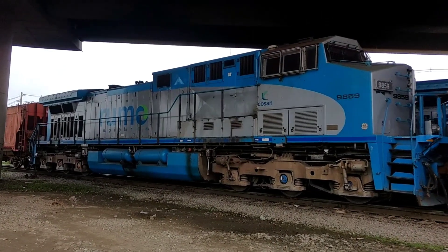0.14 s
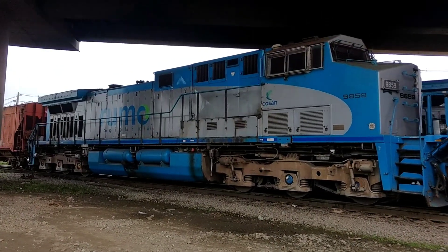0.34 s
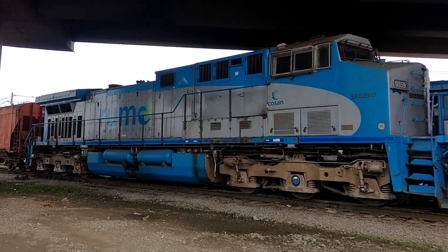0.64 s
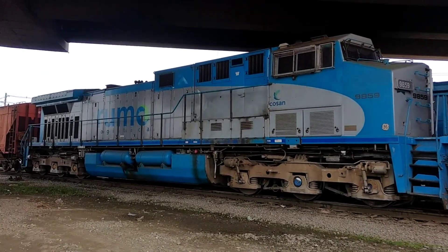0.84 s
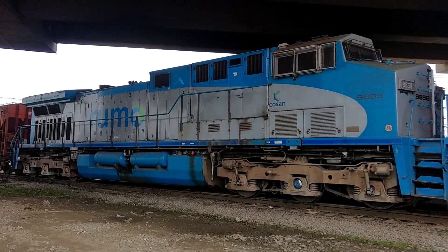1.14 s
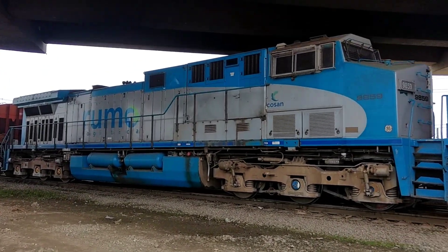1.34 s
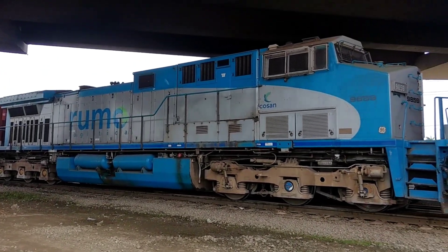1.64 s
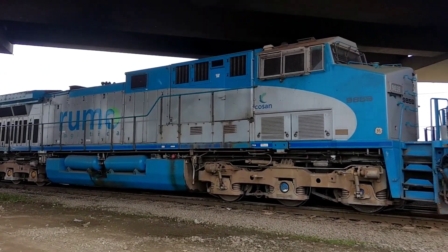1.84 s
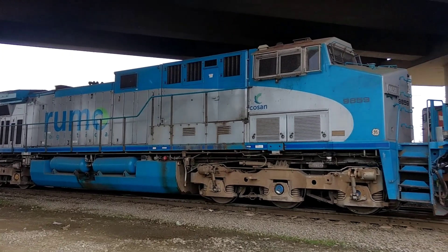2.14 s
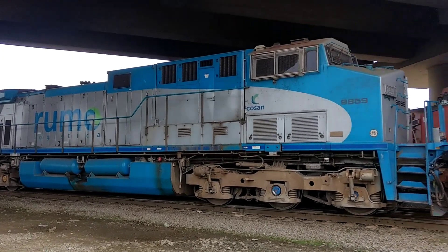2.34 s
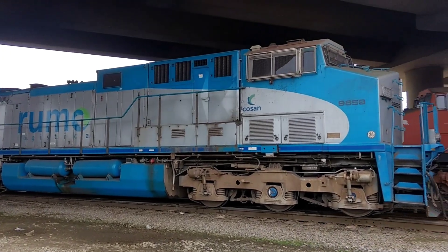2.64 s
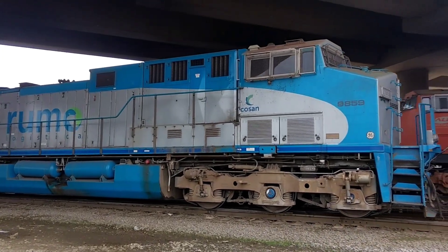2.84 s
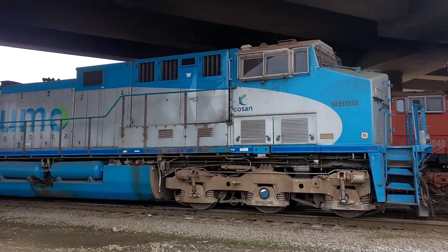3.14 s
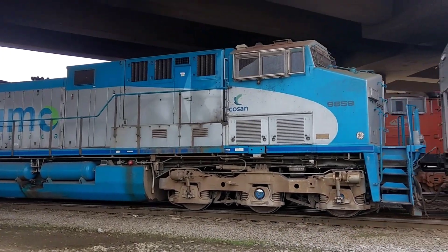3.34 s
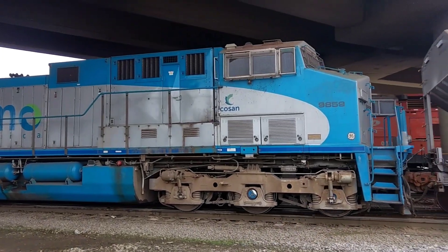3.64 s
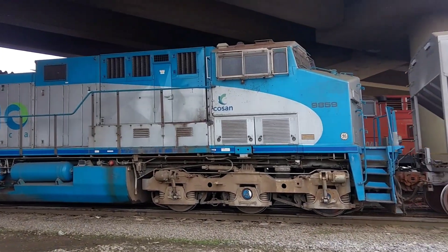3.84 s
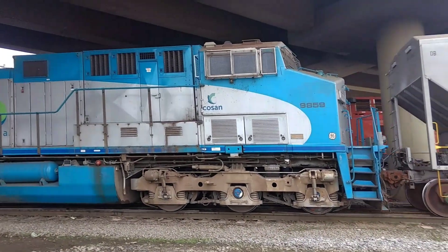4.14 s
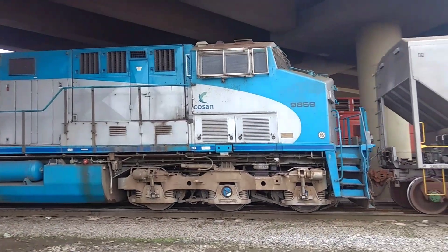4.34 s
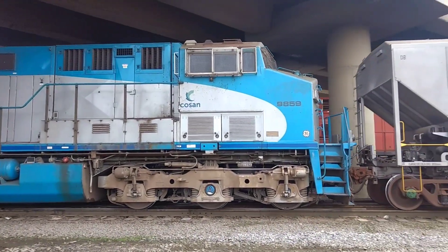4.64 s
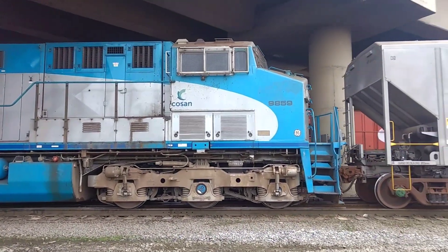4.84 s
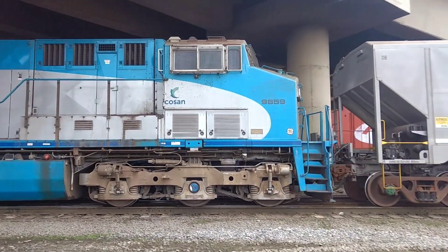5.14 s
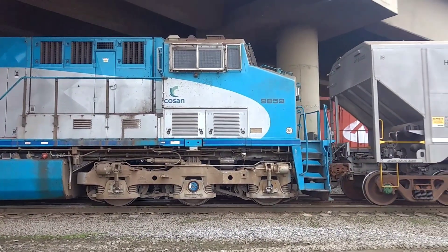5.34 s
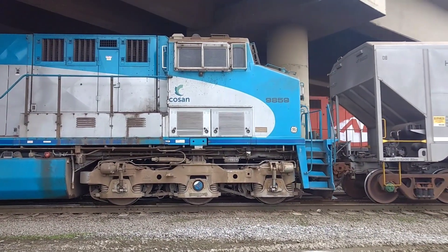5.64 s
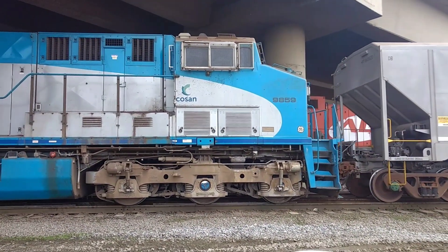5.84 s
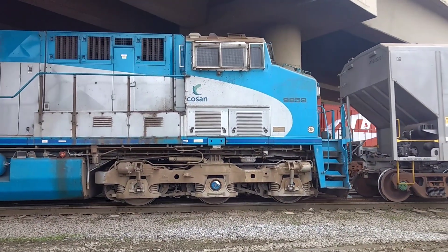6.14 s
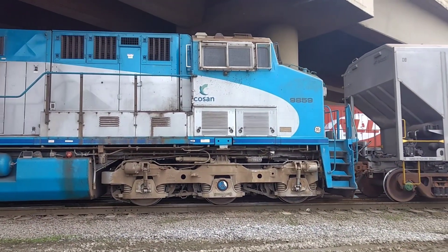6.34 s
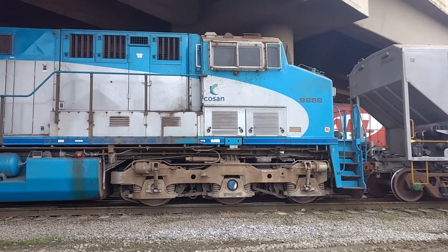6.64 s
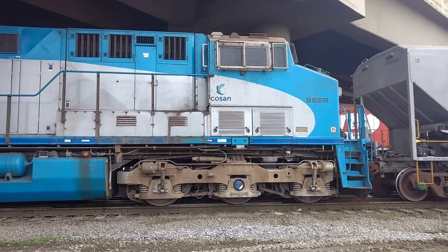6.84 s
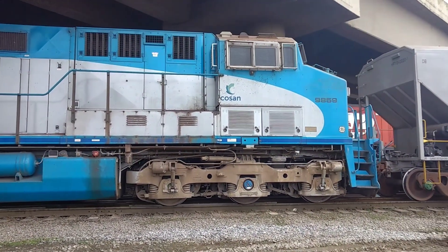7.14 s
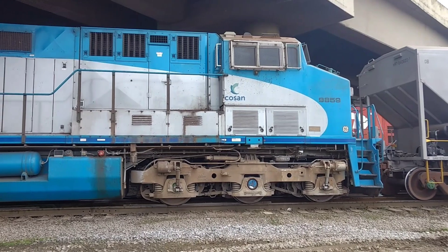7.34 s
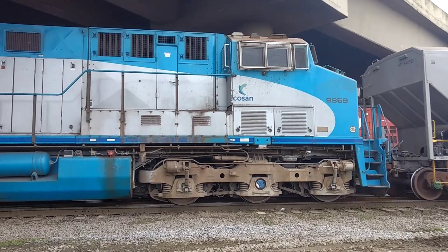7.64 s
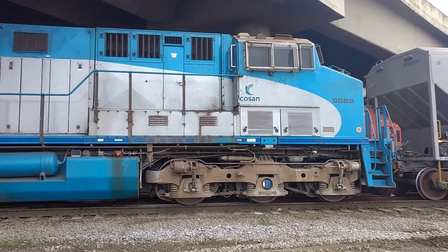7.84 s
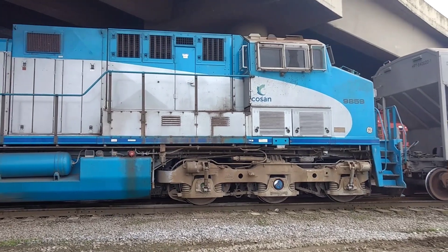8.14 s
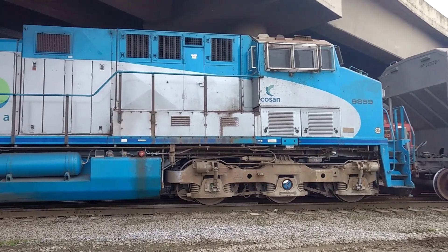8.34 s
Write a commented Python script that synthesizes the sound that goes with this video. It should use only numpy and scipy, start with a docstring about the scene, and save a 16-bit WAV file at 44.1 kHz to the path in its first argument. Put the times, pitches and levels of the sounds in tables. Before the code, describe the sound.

A heavy diesel locomotive idles close by under a concrete overpass, its low rumble throbbing about five times a second beneath mechanical whirr and a thin wavering whine. A drain valve spits hard, bright air every two-thirds of a second, with irregular softer pops between. Each burst echoes off concrete with slight wet spatter. The stereo microphone moves along, the engine fading; loud spits briefly duck it and it swells back.

```python
"""Under a concrete overpass a sixteen-cylinder diesel locomotive idles and gets quieter as the microphone moves off.
Neighbouring exhaust orders beat into one throb per engine cycle, over gated noise, gear tones and a blower whine.
Air-system drain valves spit and pop: shaped jet noise with a ringing outlet, concrete echoes and water spatter.
A metal squeak passes faintly. Loud spits push a limiter down, and the engine slowly swells back."""
import sys
import numpy as np
from scipy import signal
from scipy.fft import rfft, irfft, next_fast_len
from scipy.io import wavfile
from scipy.ndimage import uniform_filter1d, minimum_filter1d, map_coordinates

SR = 44100
rng = np.random.default_rng(int(sys.argv[2]) if len(sys.argv) > 2 else 0)


def store_wav(level_fs):
    """Save 16-bit WAV to argv[1]."""
    pcm = np.round(np.clip(np.atleast_2d(level_fs), -1, 1) * 32767)
    wavfile.write(sys.argv[1], SR, pcm.T.astype(np.int16))


N = 374409
TIME_S = np.arange(N) / SR

# Source levels are ahead of the limiter; engine, blower and valves also pass the stereo stage,
# the squeak does not. Spectra are shapes, scaled to rms 1.

# Faint metal squeak: (time [s], half length [s], frequency [Hz], level [dB])
SQUEAK = (3.46, 0.055, 3720, -51)

# Blower tone, swelling and fading through its reflections: (time [s], level [dB])
BLOWER_LEVEL = [(0.1, -31.5), (0.35, -37), (0.7, -37.5), (1.0, -42.5), (1.3, -34), (1.8, -50), (2.3, -43),
                (2.8, -43.5), (3.1, -39), (3.5, -40), (3.75, -45), (4.05, -35), (4.6, -45.5), (4.9, -42),
                (5.3, -51), (5.9, -44), (6.25, -41), (6.5, -45.5), (6.8, -48), (7.25, -40.5), (7.55, -42),
                (7.85, -41), (8.25, -40.5), (8.49, -42)]
BLOWER_HZ = 1027

CYCLE_HZ, THROB_AT_S = 4.843, 2.896  # engine cycle rate; a moment when the exhaust orders align
# Exhaust, shaded by the body as the microphone moves:
# (time [s], firing tone [dB], order just below it [dB], unequal cylinders [dB])
EXHAUST_LEVELS = [(0, -33.5, -38, -46), (1.0, -36, -47, -48), (2.1, -36.5, -41, -43.5),
                  (3.4, -33, -37.6, -46), (4.5, -40, -45, -44), (5.5, -39.5, -42, -60),
                  (6.2, -40, -40.5, -54), (6.8, -45, -44, -60), (7.6, -72, -45, -57), (8.49, -60, -47, -63)]
# Unequal cylinders around the firing rate: (multiple of the cycle [1], relative level [dB])
EXHAUST_ORDERS = [(11, -24), (13, 1.5), (14, -5.5), (17, -14)]
# Gear train: (multiple of the cycle [1], level re block noise [dB])
GEAR_ORDERS = [(36, -13.5), (72, -11), (96, -12), (120, -19), (144, -21.5), (288, -22)]
# Combustion noise alike in every cycle: (frequency [Hz], repeating power share [1])
CYCLE_REPEAT = [(50, 0.55), (75, 0.27), (105, 0.47), (160, 0.26), (300, 0.18), (700, 0.077), (2000, 0.063)]
# Block roar: (frequency [Hz], level [dB])
ROAR_SPECTRUM = [(20, -60), (42, -44), (56, -6), (85, -6.5), (115, -4.5), (140, -1), (180, -3), (250, -2),
                 (315, -2), (400, -5.5), (600, -6.5), (850, -7), (1200, -9.5), (1500, -19), (2200, -31),
                 (5000, -67)]
# Mechanical whirr: (frequency [Hz], level [dB])
WHIRR_SPECTRUM = [(700, -19), (1400, -7), (1850, 2.5), (2300, -6.5), (2900, -7), (3600, -17), (4800, -21.5),
                  (6000, -21), (7500, -19.5), (10000, -33.5), (12500, -37), (15500, -48)]
# Starting levels, and their fall as the microphone moves off toward the cab
ROAR_START_DB, ROAR_FALL_DB_PER_S = -26, 1.24
WHIRR_START_DB, WHIRR_FALL_DB_PER_S = -32, 0.82

# Regular valve, about every 2/3 s: (time [s], nominal peak [dB], length [s], outlet [Hz],
# outlet re jet [dB], shrill top re jet [dB], deck echo re hiss [dB])
SPITS = [(0.256, -6, .0071, 3280, -24, -1, -17), (0.925, -4, 0.01, 4970, -8.5, 3.5, -10.5),
         (1.5985, -3.5, 0.0041, 5940, -12, -2.5, -14), (2.2335, -3.5, 0.0051, 8200, -8, -2, -10),
         (2.9329, -4, 0.0031, 4390, -15, -3, -12), (3.6283, -4, 0.006, 4500, -20, 1, -11.5),
         (4.2655, -4, 0.0044, 8200, -17, -2, -11.5), (4.9598, -2.5, 0.0024, 8000, -14, -1.5, -14),
         (5.6205, -3.5, 0.0051, 2260, -8, 6.5, -11), (6.3, -6, 0.0024, 2300, -17, 0, -16),
         (6.9973, -5.5, 0.0029, 2350, -11, -3.5, -16), (7.655, -6.5, 0.0033, 4440, -13, -1, -18),
         (8.3216, -6, 0.0021, 6300, -8, -12, -20)]
# Pops of a second, irregular valve, and one faint high tick at 2.81 s: (time [s], nominal peak [dB],
# length [s], outlet [Hz], outlet re jet [dB], shrill top re jet [dB], deck echo re hiss [dB])
POPS = [(0.5115, -12, 0.0031, 3650, -5.5, -11, -25), (2.3502, -5.5, 0.0018, 4460, -5, -26, -27),
        (2.809, -31, 0.004, 11000, -19, -20, -20), (3.996, -9, 0.0014, 2680, 2, -11, -5.5),
        (5.4158, -10, 0.0037, 2200, 7.5, -16, -6), (6.6155, -13.5, 0.0025, 2780, -3.5, -6, -11),
        (8.072, -9.5, 0.0025, 2900, -2, 2.5, -31)]
CREST_DB = 5.5  # nominal peak above the highest short-time rms
# Air jet: (frequency [Hz], level [dB])
JET_SPECTRUM = [(500, 0.5), (1500, -5), (3000, -8.5), (4500, -6), (5300, -10), (5900, -2), (6700, -6),
                (7800, 0), (9500, -3.5), (11200, -14), (12400, 2), (14000, -22), (15500, -4.5)]
# Shrill top of the jet, drives the limiter: (frequency [Hz], level [dB])
SHRILL_SPECTRUM = [(16000, -60), (17000, 0)]
# Spatter, smeared echoes and ring: (frequency [Hz], level [dB])
SCATTER_SPECTRUM = [(1000, -8), (3000, 2), (5000, -2), (6300, 3.5), (8500, 1), (11000, -6.5), (12800, -4.5),
                    (15500, -14)]
# Ring of the overpass: (frequency [Hz], T60 [s])
OVERPASS_T60 = [(500, 0.13), (4000, 0.52), (8000, 0.79), (15000, 0.5)]
# Slap of a pillar that the microphone passes: (time [s], level re hiss [dB])
PILLAR_ECHO = [(4.3, -21), (4.96, -11), (5.42, -1.5), (5.62, -3), (6.3, -7), (6.62, -8), (7, -27)]
PILLAR_DELAY_S = 0.0177
DECK_SPREAD_S = 0.0088
WALL_DELAY_S, WALL_SPREAD_S, WALL_START_DB = 0.15, 0.0045, -33
ECHO_FALL_DB_PER_S, RING_FALL_DB_PER_S = 1.5, 0.43
SPATTER_START_DB, SPATTER_RISE_S, SPATTER_T60_S = -19, 0.0086, 0.18

# Stereo widening, phase between left and right: (frequency [Hz], lead of left [rad])
STEREO_PHASE = [(0, .9), (75, 1.2), (150, .55), (500, .4), (1000, -.55), (1250, -.9), (1700, -3.14),
                (3600, -9.42), (5350, -15.7), (17800, -59.69)]
# Stereo widening, balance: (frequency [Hz], left minus right [dB])
STEREO_BALANCE = [(30, -5), (75, 0.5), (150, 1), (300, 1.5), (600, 4.5), (1000, 1), (1400, -3.5), (2000, 0),
                  (12000, -1)]
# Scatter of opposite sign in the channels, before its comb: (frequency [Hz], level re source [dB])
STEREO_SCATTER = [(30, -22), (75, -13), (150, -6), (450, -6), (1400, -8), (2300, -17), (4000, -4.5),
                  (8000, -28), (12000, 1.5)]
# Floor of the scatter comb: (frequency [Hz], share left in the notches [1])
COMB_FLOOR = [(1000, 0.4), (1800, 1), (3600, 0.042), (5400, 0.061)]
COMB_LAG_S = 0.000562
TOP_HZ = 15600


def amp(db):
    """Decibels to gain."""
    return 10 ** (np.asarray(db) / 20)


def unit(x):
    """Scale to rms 1."""
    return x / np.sqrt(np.mean(x ** 2) + 1e-20)


def along(points, hz):
    """Read (Hz, value) points on a log frequency axis."""
    point_hz, value = np.transpose(points)
    return np.interp(np.log(hz + 1), np.log(point_hz + 1), value)


def curves(rows):
    """One value per sample for each column after the time."""
    time_s, *columns = np.transpose(rows)
    return [np.interp(TIME_S, time_s, column) for column in columns]


def wobble(knots_per_s):
    """Smooth random curve."""
    return map_coordinates(rng.standard_normal(1024), [TIME_S * knots_per_s], mode="wrap")


def filtered(x, response):
    """Apply a complex response of frequency."""
    size = next_fast_len(N + 8192)
    hz = np.fft.rfftfreq(size, 1 / SR)
    return irfft(rfft(x, size) * response(hz), size)[..., :N]


def coloured(x, spectrum):
    """Shape x by a spectrum, to rms 1."""
    return unit(filtered(x, lambda hz: amp(along(spectrum, hz))))


def noise(spectrum):
    """Fresh shaped noise, rms 1."""
    return coloured(rng.standard_normal(N), spectrum)


def tone(turns, waver_db, drift_rad, knots_per_s):
    """Line of rms 1 with wandering strength and phase."""
    strength = amp(waver_db * wobble(knots_per_s))
    phase_rad = 2 * np.pi * turns + drift_rad * wobble(knots_per_s)
    return unit(strength * np.cos(phase_rad))


def short_level(x, size=48):
    """Rms over about a millisecond."""
    return np.sqrt(np.abs(uniform_filter1d(x ** 2, size)) + 1e-18)


def squeak():
    """Rough metal squeak: a line with fast phase wander, independent per channel, swells and fades."""
    at_s, half_length_s, hz, level_db = SQUEAK
    pair = np.array([tone(hz * TIME_S, waver_db=3, drift_rad=1.3, knots_per_s=160) for channel in range(2)])
    swell = np.exp(-((TIME_S - at_s) / half_length_s) ** 2)
    return amp(level_db) * swell * pair


def blower(octave_db=-11):
    """Wavering vane-passing tone with its octave."""
    level_db, = curves(BLOWER_LEVEL)
    vanes = tone(BLOWER_HZ * TIME_S, waver_db=3.0, drift_rad=0.59, knots_per_s=14)
    octave = tone(2 * BLOWER_HZ * TIME_S, waver_db=8.0, drift_rad=0.12, knots_per_s=9.5)
    return amp(level_db) * (vanes + amp(octave_db) * octave)


def combustion(cycles, punch, cylinder_db):
    """Noise pulsed by sixteen unequal firings; a share, set per frequency, repeats every cycle."""
    pattern = np.resize(rng.standard_normal(round(SR / CYCLE_HZ)), N)

    def share(hz):
        return np.clip(along(CYCLE_REPEAT, hz), 0, 1)

    repeating = filtered(pattern, lambda hz: np.sqrt(share(hz)))
    fresh = filtered(rng.standard_normal(N), lambda hz: np.sqrt(1 - share(hz)))
    firings = 16 * (cycles % 1)
    cylinder_gain = amp(cylinder_db * rng.standard_normal(size=17))  # one spare for rounding
    strength = cylinder_gain[firings.astype(int)]
    return (repeating + fresh) * (1 + punch * strength * np.sin(np.pi * firings) ** 2)


def exhaust(cycles):
    """Pipe tones at cycle multiples; neighbouring orders beat once per cycle, the throb."""
    firing_db, beat_db, uneven_db = curves(EXHAUST_LEVELS)

    def order(k):
        return tone(k * cycles, waver_db=.8, drift_rad=.08, knots_per_s=2)

    uneven = sum(amp(db) * order(k) for k, db in EXHAUST_ORDERS)
    return amp(firing_db) * order(16) + amp(beat_db) * order(15) + amp(uneven_db) * uneven


def engine(wander_cycles=0.0035):
    """Exhaust, block roar, gear tones and whirr, all tied to one crankshaft phase."""
    # the governor lets the crankshaft wander a little
    cycles = (TIME_S - THROB_AT_S) * CYCLE_HZ + wander_cycles * wobble(1.475)
    gears = sum(amp(db) * tone(k * cycles, waver_db=3.5, drift_rad=0.99, knots_per_s=17)
                for k, db in GEAR_ORDERS)
    block = coloured(combustion(cycles, punch=0.11, cylinder_db=8.5), ROAR_SPECTRUM)
    whirr = coloured(combustion(cycles, punch=0.066, cylinder_db=7.5), WHIRR_SPECTRUM)
    roar_db = ROAR_START_DB - ROAR_FALL_DB_PER_S * TIME_S + 0.041 * wobble(6.3)
    whirr_db = WHIRR_START_DB - WHIRR_FALL_DB_PER_S * TIME_S
    return exhaust(cycles) + amp(roar_db) * (block + gears) + amp(whirr_db) * whirr


def overpass_tail(size=16384):
    """Diffuse ring of energy 1, decaying at a T60 set per frequency."""
    hz, t, z = signal.stft(rng.standard_normal(size), SR, nperseg=256)
    decay_db = 60 * t / along(OVERPASS_T60, hz)[:, None]
    fade = amp(along(SCATTER_SPECTRUM, hz)[:, None] - decay_db)
    onset = 1 - np.exp(-t / 0.00053)
    tail = signal.istft(z * fade * onset, SR, nperseg=256)[1]
    return tail / np.linalg.norm(tail)


def droplets(per_s=380, spread_db=2.5, life_s=0.00056, mist=0.08):
    """Water: decaying ticks of unequal size over a fine mist, rms 1."""
    size = amp(spread_db * np.clip(rng.standard_normal(N), -2, 2)) ** 2
    ticks = (rng.random(N) < per_s / SR) * size
    power = signal.lfilter([1], [1, -np.exp(-1 / (life_s * SR))], ticks)
    return unit(noise(SCATTER_SPECTRUM) * np.sqrt(power / power.mean() + mist))


def valve(rows, opening_s, echo_s, beams_start_db, outlet_width_hz=950, choke=0.62, ring_start_db=-8.0):
    """Brief choked air jet through a resonant outlet, then slaps, smeared echoes, spatter and ring."""
    sources = noise(JET_SPECTRUM), noise(SHRILL_SPECTRUM), noise(JET_SPECTRUM), droplets()
    jet, shrill, rebound, drops = (np.pad(x, (0, SR)) for x in sources)
    t = np.arange(SR // 5) / SR
    out = np.zeros(N + SR)
    for at_s, peak_db, length_s, outlet_hz, outlet_db, shrill_db, echo_db in rows:
        start = round(at_s * SR)
        part = slice(start, start + len(t))
        opening = 1 - np.exp(-(t / opening_s) ** 2)
        flow = opening * np.exp(-.45 * (t / length_s) ** 1.45)
        # the outlet resonates under the rush of air
        b, a = signal.iirpeak(outlet_hz, outlet_hz / outlet_width_hz, SR)
        resonance = unit(signal.lfilter(b, a, rng.standard_normal(len(t))))
        air = jet[part] + amp(outlet_db) * resonance + amp(shrill_db) * shrill[part]
        # the nozzle chokes at full flow
        burst = np.tanh(choke * flow * unit(air))
        burst *= amp(peak_db - CREST_DB) / short_level(burst).max()
        hiss_gain = burst.std() / air.std()

        def late(delay_s):
            return np.interp(t - delay_s, t, unit(flow), left=0)

        # concrete returns only the broad hiss
        pillar_db = np.interp(at_s, *np.transpose(PILLAR_ECHO))
        slaps = amp(echo_db) * late(echo_s) + amp(pillar_db) * late(PILLAR_DELAY_S)
        # deck beams smear the echo; a far wall answers late
        echo_fall_db = ECHO_FALL_DB_PER_S * at_s
        beams = np.exp(-np.abs(t - echo_s - length_s / 2) / DECK_SPREAD_S)
        wall = np.exp(-np.abs(t - WALL_DELAY_S) / WALL_SPREAD_S)
        smear = amp(beams_start_db - echo_fall_db) * beams + amp(WALL_START_DB - echo_fall_db) * wall
        # expelled water
        spatter = amp(SPATTER_START_DB - 60 * t / SPATTER_T60_S) * (1 - np.exp(-t / SPATTER_RISE_S))
        wet = amp(peak_db) / air.std() * np.hypot(smear, spatter) * drops[part]
        ring_db = ring_start_db - RING_FALL_DB_PER_S * at_s
        ring = amp(ring_db) * hiss_gain * np.sqrt(len(t)) * overpass_tail()
        out[part] += burst + hiss_gain * slaps * rebound[part] + wet
        out[start:start + len(ring)] += ring
    return out[:N]


def valves():
    """Regular valve snaps open; the second opens more softly, nearer the deck."""
    spits = valve(SPITS, opening_s=0.0012, echo_s=0.0454, beams_start_db=-24.0)
    pops = valve(POPS, opening_s=0.0037, echo_s=0.0355, beams_start_db=-19)
    return spits + pops


def widened(x, size):
    """Two channels with phase and level differences, plus comb-filtered phase-scrambled scatter."""
    def lead_rad(hz):
        return np.interp(hz, *np.transpose(STEREO_PHASE))

    def tilt(hz):
        return amp(along(STEREO_BALANCE, hz) / 2)

    def comb(hz):
        return np.hypot(np.sin(2 * np.pi * hz * COMB_LAG_S), along(COMB_FLOOR, hz))

    z = signal.stft(x, nperseg=size)[2]
    scrambled = z * np.exp(2j * np.pi * rng.random(z.shape))
    scatter = signal.istft(scrambled, nperseg=size)[1][:N]
    scatter = filtered(scatter, lambda hz: amp(along(STEREO_SCATTER, hz)) * comb(hz))
    pair = np.array([x + scatter, x - scatter])
    return filtered(pair, lambda hz: np.array([tilt(hz), np.exp(-1j * lead_rad(hz)) / tilt(hz)]))


def scene(swing_db=2.5):
    """Sum in stereo; engine and blower drift left as the microphone turns."""
    left_db = swing_db * (TIME_S / TIME_S[-1] - .5)
    pan = amp(np.array([left_db, -left_db]) / 2)
    machine = widened(engine() + blower(), size=2048) * pan
    return squeak() + machine + widened(valves(), size=64)


def limiter(x, ceiling_db=-17, release_db_per_s=11, start_db=-7.0, attack_s=0.00008):
    """Shared gain, held down at first, dives around a peak and climbs back at a steady rate."""
    room_db = np.minimum(ceiling_db - 20 * np.log10(short_level(x).mean(axis=0)), 0)
    climb_db = release_db_per_s * TIME_S
    held_db = np.minimum.accumulate(minimum_filter1d(room_db, size=45) - climb_db)
    gain_db = np.minimum(held_db, start_db) + climb_db
    # one-pole smoothing of the gain
    keep = np.exp(-1 / (attack_s * SR))
    smooth_db = start_db + signal.lfilter([1 - keep], [1, -keep], gain_db - start_db)
    return x * amp(smooth_db)


def record(dry):
    """Limit, then low-pass steeply at TOP_HZ."""
    return filtered(limiter(dry), lambda hz: 1 / np.sqrt(1 + (hz / TOP_HZ) ** 220))


dry = scene()
out = record(dry)
store_wav(out)
```